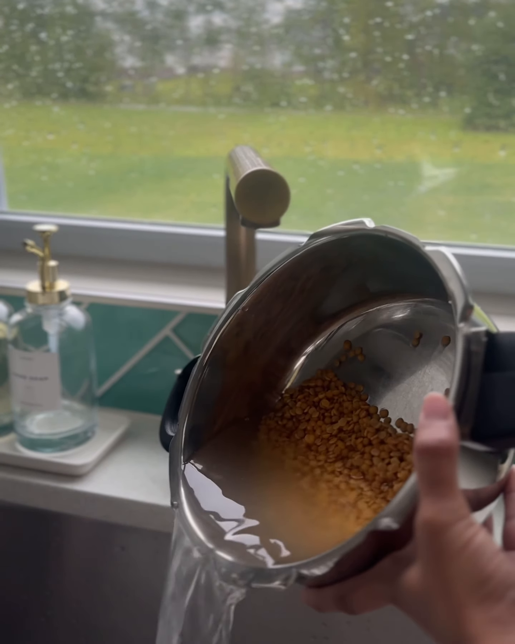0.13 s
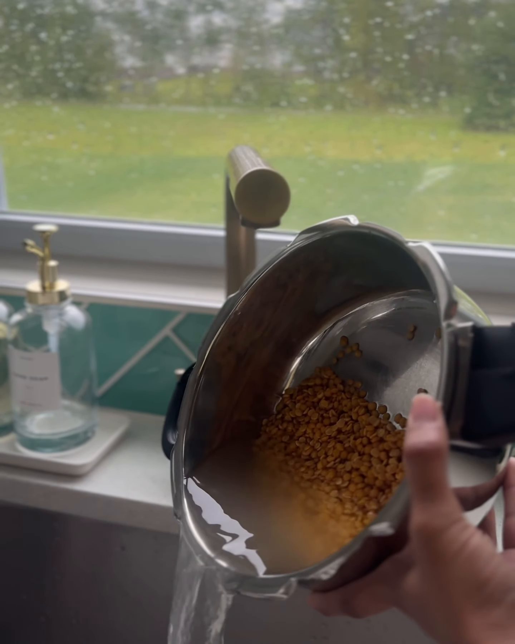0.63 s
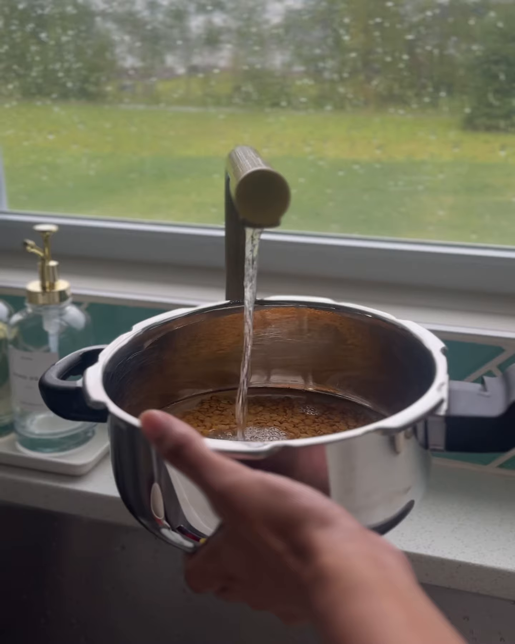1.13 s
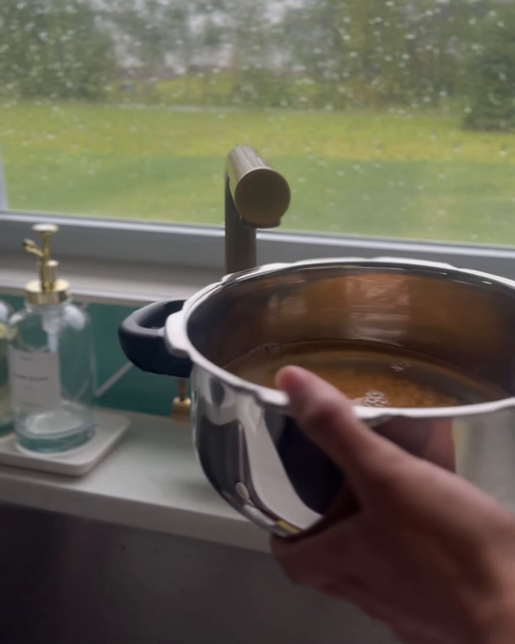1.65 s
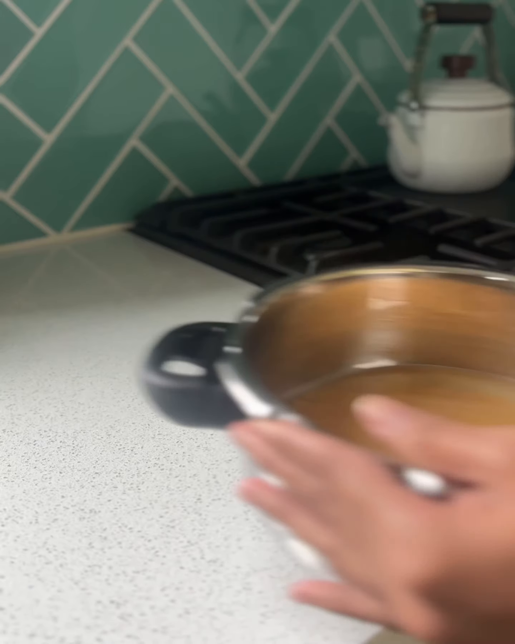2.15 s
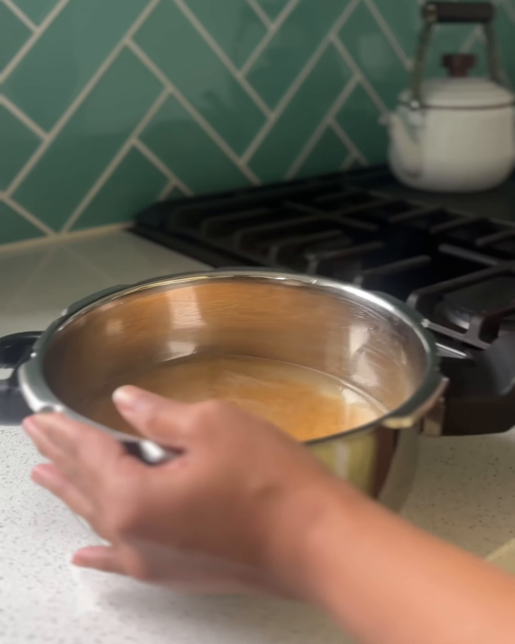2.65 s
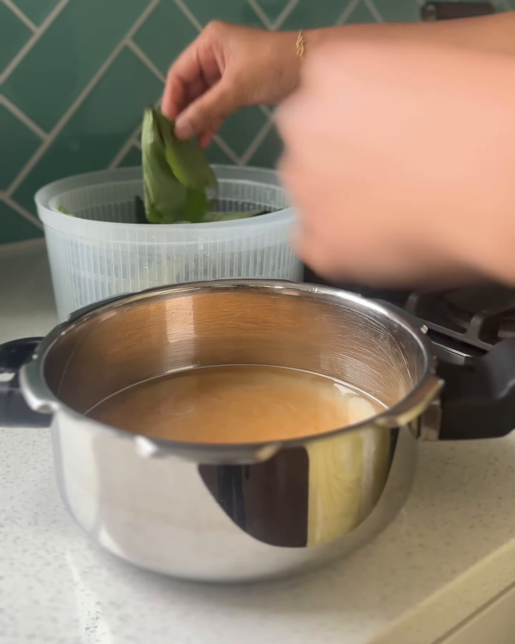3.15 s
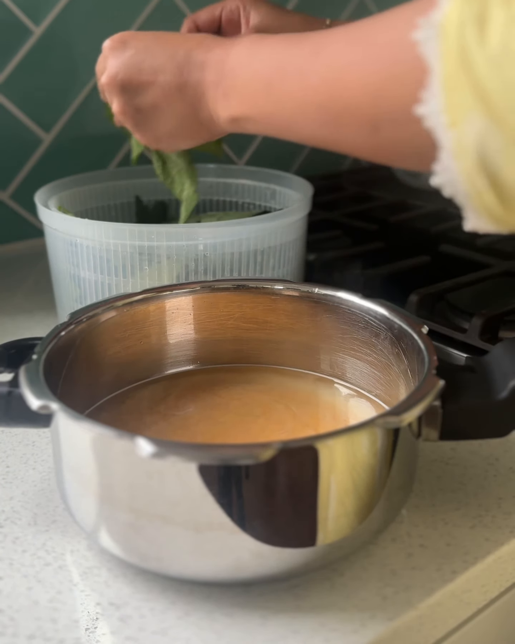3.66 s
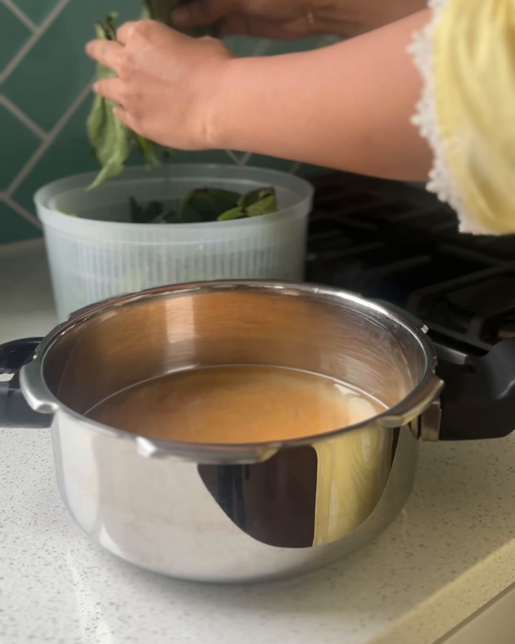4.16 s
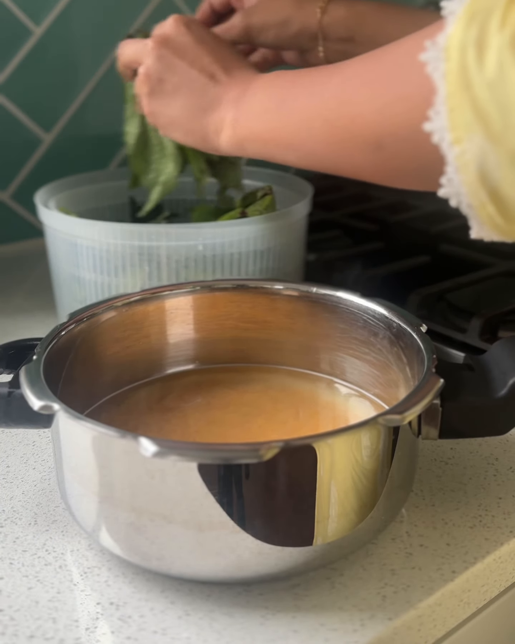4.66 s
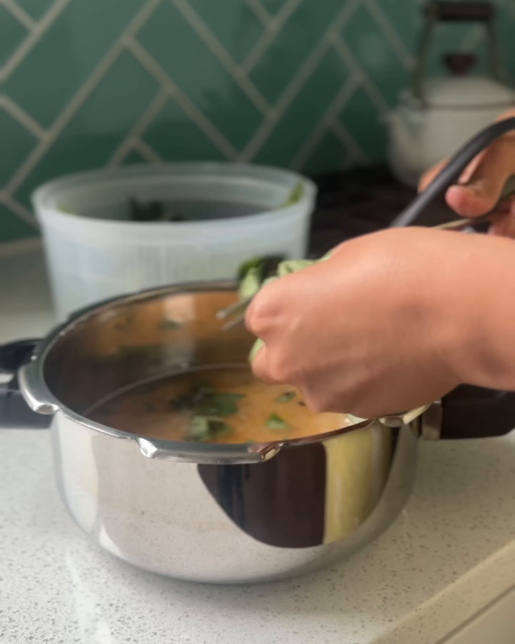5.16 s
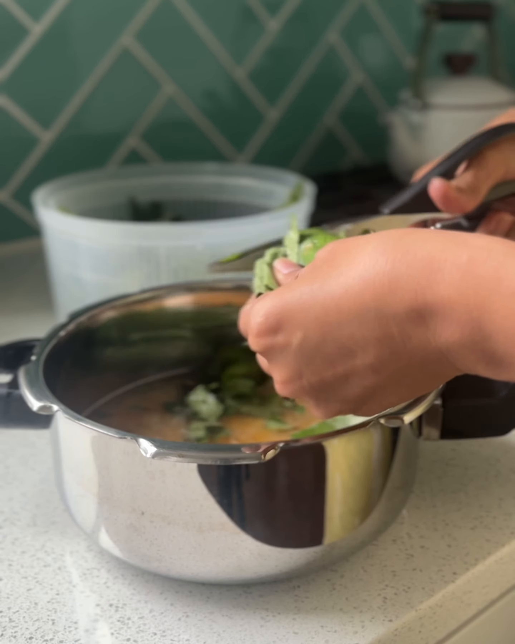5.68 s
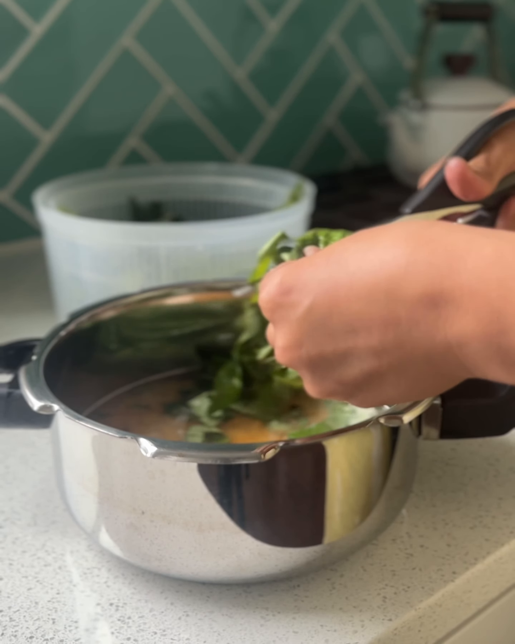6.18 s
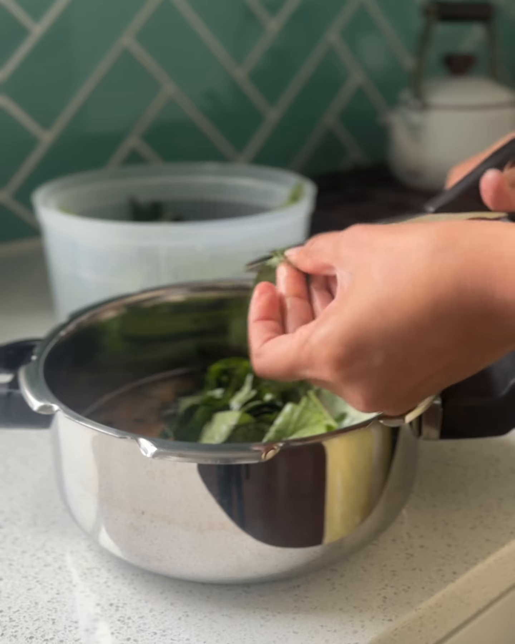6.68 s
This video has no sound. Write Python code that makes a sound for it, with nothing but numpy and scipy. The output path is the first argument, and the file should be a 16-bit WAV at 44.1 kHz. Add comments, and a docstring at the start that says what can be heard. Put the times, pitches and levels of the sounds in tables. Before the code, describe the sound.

Water sloshes hard into a sink, a thin tap stream gurgles in a pot, the pot clanks on stone, then leaves are torn and snipped.

```python
"""Kitchen shots: pot, water and leaves

Short shots on hard cuts, close to a phone: water tipped from a steel pot drums on the sink, a thin tap
stream gurgles in the pot, the pot lands on a stone counter, leaves are torn, then snipped with scissors.
Noise bands make the water and leaves, gliding sines the bubbles, dying sines the pot, slab and blades.
The hard room rings after the pot and leaf sounds; a low hum and a faint hiss lie underneath."""
import sys
import numpy as np
from scipy import signal
from scipy.fft import rfft, irfft
from scipy.io import wavfile
from scipy.ndimage import uniform_filter1d

SR = 44100
rng = np.random.default_rng(int(sys.argv[2]) if len(sys.argv) > 2 else 0)


def ratio(d):
    """dB to gain"""
    e = np.asarray(d, float) / 20
    return 10 ** e


def master_out(mix):
    """Clip the mix to full scale and print it as 16-bit PCM to the path in sys.argv[1]."""
    frames = np.transpose(np.atleast_2d(mix))
    ceiling = np.clip(frames, -1, 1)
    pcm = np.round(ceiling * 32767).astype(np.int16)
    wavfile.write(sys.argv[1], SR, pcm)


N = 300321
T = np.arange(N) / SR

# where one shot ends and the next begins: t/s
CUTS = [0, .079, .697, 1.365, 1.988, 2.973, 3.353, 3.744, 4.1417, 4.543, 4.933, 5.432, 5.933, 6.453, 6.81]
# colour of spray and fizz: f/Hz, relative level per Hz/dB
SPRAY = [(300, -3.5), (500, -15.5), (800, -16.5), (1300, -24), (2000, -12.5), (2600, -8), (3500, -2.5),
         (5000, -2), (6500, 2.5), (8000, 3.5), (10000, 2), (12500, 4), (14500, -1.5), (16000, -3)]
# colour of the leaf noise and of the tails after snips: f/Hz, relative level per Hz/dB
LEAF = [(80, -50), (300, -10), (600, -8), (1300, -6), (2000, -4.5), (2400, -4), (3500, -9), (5500, -3),
        (8000, -8), (10500, 3.5), (13000, -3.5), (16000, -13)]
# one shot rises from a low level: t/s, starting level/dB, time constant/s
FADE_UP = (3.744, -27, 0.13)


def colour(x, table, tilt_db=0., band=None):
    """Shape by (Hz, dB) points and a tilt per octave; with a band, white rms 1 ends as rms 1 inside it."""
    hz = np.fft.rfftfreq(x.shape[-1], 1 / SR) + 1
    table_hz, table_db = np.array(table).T
    level_db = np.interp(np.log(hz), np.log(table_hz), table_db)
    gain = ratio(level_db + tilt_db * np.log2(hz / 2500))
    if band:
        inside = (hz > band[0]) * (hz < band[1])
        gain = gain / np.sqrt(np.mean(gain ** 2 * inside))
    return irfft(rfft(x) * gain, x.shape[-1])


def wide(length, side_db=0.):
    """Independent mid and side noise; the side has its own colour, so the width varies with frequency."""
    # side colour, almost none at 10.5-13.4 kHz: f/Hz, side minus mid level/dB before side_db
    side_width = [(60, -33.5), (200, -12.5), (400, -4), (700, 3), (1000, 1.5), (1600, -8), (2050, -14),
                  (2600, -1.5), (5000, 0), (6000, -16), (8000, -8.5), (9500, -6), (10500, -37),
                  (13400, -40), (14200, -12.5), (16000, -9.5)]
    mid, side = rng.standard_normal((2, length))
    return np.array([mid, ratio(side_db) * colour(side, side_width)])


def bandpass(x, hz, width):
    """Steep band around hz."""
    edges = [max(hz - width / 2, 20), min(hz + width / 2, .45 * SR)]
    return signal.sosfilt(signal.butter(N=2, Wn=edges, btype="band", fs=SR, output="sos"), x)


def flicker(rate, db, length=N):
    """Random gain that moves to a new value about rate times a second."""
    k = max(int(SR / rate), 1)
    steps = np.repeat(rng.standard_normal(length // k + 1), k)
    return ratio(db * 1.6 * uniform_filter1d(steps, k)[:length])


def curves(shots):
    """Columns over time; each shot keeps to its own span, silence elsewhere."""
    out = np.full((len(shots[0][0]) - 1, N), -200.)
    for rows in shots:
        s, *columns = np.transpose(rows)
        shot = np.searchsorted(CUTS, np.mean(s)) - 1
        inside = (T >= CUTS[shot]) & (T < CUTS[shot + 1])
        out[:, inside] = [np.interp(T[inside], s, c) for c in columns]
    return out


def add(out, s, x, peak_db=None):
    """Place a sound at s, scaled to peak_db if given; the next cut chops it."""
    next_cut = CUTS[np.searchsorted(CUTS, s, "right")]
    i, end = int(s * SR), min(int(next_cut * SR), N)
    if peak_db is not None:
        x = x * ratio(peak_db) / np.abs(x).max()
    out[..., i:min(i + x.shape[-1], end)] += x[..., :end - i]


def ring(modes, t):
    """Resonances of a struck body: a sum of dying sines from (Hz, dB, t60 s) rows."""
    return sum(ratio(db) * np.sin(2 * np.pi * hz * t) * np.exp(-np.log(1000) * t / t60)
               for hz, db, t60 in modes)


def swell(length, rise=.25):
    """Quick rise and slower fall on a time scale of length seconds."""
    t = T[:int(4 * length * SR)] / length
    return (1 - np.exp(-t / max(rise, .01))) * np.exp(-2.5 * t)


def bubble(hz, cycles, glide, onset=0.58):
    """A trapped bubble rings a few cycles; a positive glide lifts its pitch as it nears the surface."""
    turns = hz * T[:int(5 * cycles / hz * SR)]
    tone = np.sin(2 * np.pi * turns * (1 + glide * turns))
    tone = tone * np.exp(-turns / cycles) * (1 - np.exp(-turns / onset))
    return tone * [[1], [-.3]]  # mid, side


def pour():
    """The falling sheet drums the thin sink floor; spray hisses, fizzes, slaps and bubbles."""
    # one block per shot: t/s, drumming level/dB, spray level/dB
    sheet = [
        [(0.0, -46.5, -48.5), (0.079, -39, -42.5)],
        [(0.079, -46.5, -48.5), (0.275, -43.5, -50.5), (0.415, -47.5, -50), (0.6, -43, -45),
         (0.697, -40.5, -53)],
    ]
    # sink floor: f/Hz, relative level per Hz/dB
    sink = [(20, -25), (60, -8.5), (85, -10), (103, 7.5), (122, -13), (145, 3), (165, -5), (195, -4),
            (227, -11.5), (290, -16), (325, -12), (370, -18), (520, -12.5), (700, -24), (1000, -30.5),
            (1600, -33.5)]
    # slaps of water: t/s, peak level/dB, centre f/Hz
    splashes = [(0.038, -24.5, 3700), (0.19, -31.5, 6630), (0.264, -19, 8230), (0.3326, -21.5, 5730),
                (0.375, -27, 9030), (0.423, -23.5, 7530), (0.488, -22, 7580), (0.5017, -20, 6630),
                (0.5542, -17.5, 3860), (0.6289, -21, 4060), (0.246, -28.5, 7000), (0.297, -30, 7500),
                (0.345, -30, 5500), (0.45, -28, 6500), (0.592, -26, 4050), (0.601, -27.5, 4050)]
    # single bubbles that stand out of the spray: t/s, peak level/dB, f/Hz
    clear_bubbles = [(0.118, -41.5, 1415), (0.1415, -42, 2380), (0.271, -47, 3290), (0.3627, -40.5, 2470),
                     (0.375, -46, 2230), (0.4514, -57, 3600), (0.523, -42, 2090), (0.531, -31, 3070),
                     (0.539, -37, 3300), (0.5752, -31.5, 3500)]
    drum_db, spray_db = curves(sheet)
    n = int(SR * .7)
    out = np.zeros((2, N))
    drum = colour(wide(n, -18.0), sink, band=(60, 250)) * flicker(30, 1.6, n)
    spray = colour(wide(n, 0.91), [(150, -12.5)] + SPRAY, band=(2000, 6000)) * flicker(60, 1.8, n)
    # patches of spray flare up briefly, each in one band
    for s, pitch, size, span in rng.random((110, 4)):
        shape = swell(0.0035 + 0.017 * span, rise=0.1)
        hz = 1800 * 5.5 ** pitch
        patch = shape * bandpass(wide(len(shape), -2.7), hz, 0.21 * hz)
        add(spray, s * .68, patch, -3.0 + 4 * pitch + 6 * size)
    # fizz of tiny bubbles, few of them loud
    for s, pitch, size in rng.random((900, 3)):
        gain = ratio(-12.5 - 2.7 * np.log(size + .03))
        add(spray, s * .68, gain * bubble(900 * 10 ** pitch, 3.2, 0.004))
    out[:, :n] = ratio(drum_db[:n]) * drum + ratio(spray_db[:n]) * spray
    for s, db, hz in splashes:
        shape = swell(.015, rise=0.082)
        shape = shape * (1 + 0.9 * np.exp(-T[:len(shape)] / 0.003))
        noise = wide(len(shape), -1.4)
        slap = bandpass(noise, hz, 0.28 * hz)
        slap = slap + 0.42 * colour(noise, SPRAY) + 0.12 * bandpass(noise, 1500, 1800)
        add(out, s - .002, shape * slap, db)
    for s, db, hz in clear_bubbles:
        add(out, s - .001, bubble(hz, 6.3, 0.0036), db)
    return out


def tap():
    """The stream shakes the pot wall; air dragged under rings as bubble pairs with small-bubble noise."""
    # gulps of air: t/s, peak level/dB, bubble f/Hz, small-bubble level re gulp/dB, small-bubble f/Hz
    gulps = [(0.712, -50, 1070, -1, 3140), (0.748, -54.5, 1175, 15, 3100), (0.77, -50.5, 1190, 6.5, 2960),
             (0.797, -56, 1156, 10, 3100), (0.808, -48.5, 910, 8.5, 2990), (0.818, -55, 897, 5, 3050),
             (0.873, -51, 877, 5.5, 3035), (0.91, -40, 1066, -0.5, 2380), (0.925, -46.5, 898, -5, 3230),
             (1.026, -47.5, 993, 6, 2320), (1.04, -50, 1066, 3.5, 2320), (1.088, -41, 937, -6.5, 3140),
             (1.172, -56, 1000, 6, 2230), (1.195, -46, 1110, -5, 2400), (1.207, -36, 935, -18, 2380),
             (1.221, -48, 950, -1.5, 3120), (1.256, -42.5, 970, -14, 2090), (1.289, -47, 1068, -9, 3130),
             (1.325, -47, 880, -30, 2960)]
    # wall of the wet pot: f/Hz, width/Hz, relative level/dB
    wet_wall = [(318.5, 25, 1), (913, 130, 3), (1120, 160, -3), (1850, 110, -9), (2100, 340, -20),
                (2380, 220, -5), (2900, 200, -16.5), (3140, 240, -10)]
    stream_db, fizz_db = -58.5, -76
    bubbling_s, gulp_s = .65, .013
    start = CUTS[2]
    out, n = np.zeros((2, N)), int(SR * .67)
    wall = sum(ratio(db) * bandpass(wide(n, -17) * flicker(45, 2.8, n), hz, width)
               for hz, width, db in wet_wall)
    add(out, start, ratio(stream_db) * wall / wall[0].std())
    fizz = colour(wide(n, -10), SPRAY, band=(2000, 6000)) * flicker(82, 2.5, n)
    add(out, start, ratio(fizz_db) * fizz)
    for s, pitch, size in rng.random((450, 3)):
        small = bubble(800 * 4.5 ** pitch, 5.5, 0.0073)
        add(out, start + bubbling_s * s, small, -64 - 2.0 * np.log(size + 0.031))
    weak = [(start + bubbling_s * s, -55 + 6 * (size - .5), 800 + 300 * pitch,
             12 * (small - .5), 2100 + 1000 * high)
            for s, size, pitch, small, high in rng.random((9, 5))]
    shape, wash = swell(gulp_s, rise=0.18), swell(0.017, rise=0.16)
    for s, db, hz, small_db, small_hz in gulps + weak:
        noise = wide(len(shape), -9.0)
        add(out, s - .003, bubble(hz, gulp_s * hz * 0.49, 0.0022, onset=2.2), db)
        # a lower twin beats against the first bubble
        add(out, s + .001, bubble(.9 * hz, gulp_s * hz * 0.8, -0.00096, onset=3.5), db - 8.5)
        add(out, s - .003, shape * bandpass(noise, hz, 190), db - 4.0)
        add(out, s - .003, shape * bandpass(noise, small_hz, 310), db + small_db)
        # the wall answers in all its bands but the lowest
        answer = sum(ratio(g) * bandpass(wide(len(wash), -9), f, w) for f, w, g in wet_wall[1:])
        add(out, s - .002, wash * answer, db - 8.5)
    return out


def knocks():
    """A short push rings slab and pot with a rough lingering clank; bumps ring a dull pair of modes."""
    # pot base meeting the counter: t/s, peak level/dB, push time constant/ms
    landing = (2.6588, -8.5, 0.037)
    # dry pot: f/Hz, relative level/dB, t60/s (capped at 0.3 s below)
    dry_pot = [(190, -7, 0.49), (286.8, -16.5, 0.92), (340, -4.5, 0.73), (493.6, -4.5, 0.31),
               (576, -8.5, 0.11), (687, -6, .8), (770, -9, 0.39), (820, -5.5, 0.3), (864, -4, 0.37),
               (990, -14, .5), (1280, -16.5, .5), (1346, -13.5, .5), (1555, -12.5, .35), (1704, -13, 0.23),
               (2040, -11.5, .1), (3700, -28, .2), (980, -9, 0.082), (1500, -19.5, 5.0),
               (1647, -12.5, 0.12), (1860, -5.5, 0.17), (2230, -25, 0.54), (2470, -28, 0.89),
               (2568, -5, 0.17), (3450, -34, 0.56), (5270, -41, 0.62), (6725, -40, 0.62)]
    # counter slab: f/Hz, relative level/dB, t60/s
    slab = [(150, -22, 0.12), (340, -4, 0.11), (290, -12.5, 0.091), (1613, 16, 0.0085), (830, 2, 0.025),
            (524, -14, 0.02), (665, -5, 0.048), (2600, -5.5, 0.036), (3700, -12, 0.011), (5500, -8, 0.013)]
    # rough clank: f/Hz, relative level per Hz/dB
    clank_colour = [(120, -9), (350, -3.5), (700, 5.5), (1600, -3), (2300, -7), (2650, -3.5), (3000, -17.5),
                    (3500, -10.5), (4000, -15.5), (4400, -23.5), (7000, -15.5), (10000, -21),
                    (16000, -29.5)]
    # soft bumps as the pot rocks and the colander is nudged: t/s, peak level/dB, f/Hz, t60/s
    bumps = [(2.868, -30, 750, 0.041), (2.8765, -30.5, 674, 0.02), (2.889, -49, 810, .025),
             (2.909, -32, 673, 0.023), (2.926, -40.5, 607, 0.05), (3.914, -56, 202, 0.025),
             (4.005, -64, 775, 0.025), (4.011, -49, 150, 0.016), (4.036, -63, 201, 0.018),
             (4.089, -56, 150, 0.027), (4.119, -54, 160, 0.024), (4.088, -61.5, 820, 0.029),
             (4.118, -60, 665, 0.048), (4.130, -51, 830, 0.03), (4.1355, -42.5, 777, 0.02),
             (4.138, -46, 170, 0.056)]
    out, t = np.zeros(N), T[:int(.35 * SR)]
    s, db, ms = landing
    pot = sum(ring([(f, g, min(d, .3))], t) * flicker(60, 1.2, len(t)) for f, g, d in dry_pot)
    decay = 0.6 * np.exp(-t / 0.0078) + 0.14 * np.exp(-t / 0.028) + 0.081 * np.exp(-t / 0.1382)
    clank = colour(rng.standard_normal(len(t)), clank_colour) * decay
    push = (t[:300] / ms) ** 2 * np.exp(-t[:300] / ms * 1000)
    body = ring(slab, t) + ratio(-19.5) * pot + ratio(9.0) * clank
    # the base lands edge first, so the blow builds over a millisecond
    body = body * (1 - np.exp(-t / 0.001))
    add(out, s, bandpass(np.convolve(body, push), 7940.0, 15683), db)
    for s, db, hz, t60 in bumps:
        scuff = colour(rng.standard_normal(len(t)), clank_colour) * np.exp(-t / 0.0022)
        pair = ring([(hz, 0, t60), (1.123 * hz, -6, t60)], t) * flicker(150, 0.97, len(t))
        add(out, s, (pair + 0.19 * scuff) * (1 - np.exp(-t / 0.0025)), db)
    return out


def leaves():
    """Snaps are a few ms of noise with a blade ring; crunches are swarms of tiny cracks."""
    # stems giving way, blades and rims touching; at 4.139 s the click of a cut:
    # t/s, peak level/dB, centre f/Hz, treble level re peak/dB
    snaps = [(2.906, -47.5, 2900, -13), (3.653, -56, 2780, 4), (3.702, -49, 2757, -21),
             (4.139, -57, 2500, -8), (4.2845, -59.5, 2000, -20), (4.7273, -43.5, 2500, -8),
             (4.731, -43, 2400, -8), (4.737, -45, 2340, -10), (4.8815, -49, 1830, -16),
             (4.94, -50, 2380, -6), (5.014, -52, 2400, 14.5), (5.0305, -43, 1380, -10),
             (5.0464, -34, 2380, -14), (5.086, -44, 2320, 5), (5.0253, -43, 2400, -1),
             (5.1276, -35.5, 2240, -9), (5.1286, -27.5, 2100, 1), (5.137, -39, 2300, -5.5),
             (5.1388, -38, 2300, -11), (5.1419, -23.5, 4850, 7), (5.1415, -37, 750, -6),
             (5.1494, -29.5, 2160, 9.5), (5.16, -45, 6000, 23), (5.167, -46, 6040, 21.5),
             (5.2752, -48, 2500, -12), (5.309, -47.5, 2470, -12.5), (5.5027, -38, 2100, 5),
             (5.5331, -27, 2000, 4.5), (5.5401, -38, 2140, 6), (5.544, -30, 2260, 0),
             (5.662, -57, 2500, 19), (5.5661, -29, 2400, -19), (5.6742, -38.5, 5700, 0),
             (5.9762, -57, 2620, 19), (5.9975, -45, 2400, 12), (6.007, -45, 2380, 16),
             (6.011, -39, 2300, -6.5), (6.027, -36, 2390, 8), (6.041, -35, 2500, -2),
             (6.044, -40, 790, -20), (6.047, -37, 2300, -5), (6.071, -43, 2200, -8),
             (6.096, -43, 2300, -12), (6.56, -65, 4200, 29.5), (6.5695, -60, 5560, 18),
             (6.586, -59, 4430, 18), (6.598, -54, 6000, 13), (6.6028, -36.5, 6160, 11),
             (6.613, -57, 6000, 17), (6.6363, -25, 2100, -3), (6.645, -48, 2320, -21.5)]
    # leaves tearing or crushed between the blades: t/s, length/s, level/dB, tilt/dB per octave
    crunches = [(2.976, 0.049, -66, -3.5), (3.643, 0.04, -66, -2), (3.68, 0.064, -69, -1.5),
                (3.975, 0.037, -80, 2), (4.673, 0.076, -66.5, -4), (4.716, 0.03, -57.5, -2),
                (4.863, 0.0094, -65, -3), (5.493, 0.027, -59, 0), (4.935, 0.018, -59, 1),
                (5.021, 0.018, -51, 2.5), (5.041, 0.017, -53, 3.5), (5.06, 0.04, -61, 0),
                (5.121, 0.041, -39.5, 0.5), (5.265, 0.035, -70.5, 12), (5.384, 0.021, -76, -7),
                (5.523, 0.026, -41.5, 1.5), (5.986, 0.056, -53, 1.5), (6.025, 0.032, -47.5, 0.5),
                (6.179, 0.012, -55, 2), (6.598, 0.035, -54, 4), (6.627, 0.02, -48.5, -0.5)]
    # faint ticks of handled leaves: from t/s, to t/s, middle peak level/dB, spread either way/dB
    faint_ticks = (4.55, 6.63, -65, 3)
    blade = [(2400, -24, 0.06)]  # f/Hz, level re snap/dB, t60/s
    cracks_per_s, crack_s, even_bed = 500, .001, .3
    out, t = np.zeros(N), T[:int(.05 * SR)]
    start, end, tick_db, spread_db = faint_ticks
    ticks = [(start + (end - start) * s, tick_db + spread_db * 2 * (size - .5),
              1700 * 2.5 ** pitch, 20 * (treble - .5))
             for s, size, pitch, treble in rng.random((12, 4))]
    snap_shape = (1 - np.exp(-t / .0005)) * (np.exp(-t / .0015) + .15 * np.exp(-t / .006))
    for s, db, hz, treble_db in snaps + ticks:
        noise = rng.standard_normal(len(t)) * snap_shape
        low = bandpass(noise, hz, 0.65 * hz)
        add(out, s - .001, low / np.abs(low).max() + ring(blade, t), db)
        add(out, s - .001, bandpass(noise * np.exp(-t / 0.003), 10950, 7800), db + treble_db)
    for s, length, db, tilt in crunches:
        part = T[:int(1.6 * length * SR)] / length
        n = len(part)
        shape = np.clip(part / 0.25, 0, 1) * np.clip(1.6 - part, 0, 1.1) ** 0.86
        starts = (rng.random(n) < cracks_per_s / SR) * rng.random(n)
        bursts = even_bed + signal.lfilter([1], [1, -np.exp(-1 / (crack_s * SR))], starts)
        grains = rng.standard_normal(n) * bursts * flicker(900, 2.26, n)
        cracks = colour(grains, LEAF, tilt, band=(1000, 6000))
        squeak = ratio(-5) * bandpass(cracks, 2400, 280)
        add(out, s, ratio(db) * shape * (cracks + squeak))
    return out


def rubs():
    """Wet leaves rub in a narrow band that swells softly; faint patches of rustle come at random."""
    # clear squeaks: t/s, length/s, peak level/dB, f/Hz
    squeaks = [(3.482, 0.065, -62, 2600), (3.673, 0.072, -53.5, 2720), (4.2, .02, -75.5, 2900),
               (4.28, 0.03, -68, 2900), (4.659, 0.01, -56.5, 5640), (5.392, 0.024, -50, 2100)]
    # faint patches while leaves are handled: from t/s, to t/s, middle peak level/dB, spread either way/dB
    patches = (2.98, 4.93, -74, 4)
    out = np.zeros(N)
    start, end, patch_db, spread_db = patches
    faint = []
    for s, span, size, pitch in rng.random((45, 4)):
        at = start + (end - start) * s
        # none in the first 0.2 s of the shot that fades up
        if abs(at - FADE_UP[0] - .1) > .1:
            level_db = patch_db + spread_db * 2 * (size - .5)
            faint.append((at, 0.014 + 0.04 * span, level_db, 1800 * 4.5 ** pitch))
    for s, length, db, hz in squeaks + faint:
        shape = swell(length, rise=0.38)
        noise = rng.standard_normal(len(shape)) * flicker(296, 1.4, len(shape))
        add(out, s, shape * bandpass(noise, hz, 0.24 * hz), db)
    return out


def snip_tails():
    """After each main snip a hissy room tail fades evenly, then drops faster."""
    # t/s, starting level/dB, time until the faster drop/s
    tails = [(4.721, -91, .3), (5.16, -62.5, .3), (5.55, -63, 0.29), (6.03, -64, 0.38), (6.631, -69.5, .3)]
    fade_db_per_s, stop_db_per_s, tilt_db_per_octave = -43, -200, -2.5
    out, t = np.zeros((2, N)), T[:SR // 2]
    for s, db, length in tails:
        noise = colour(wide(len(t)), LEAF, tilt_db_per_octave, band=(1000, 6000))
        noise = noise * flicker(30, 1.5, len(t))
        level = ratio(db + fade_db_per_s * t + stop_db_per_s * np.clip(t - length, 0, None))
        add(out, s, level * (1 - np.exp(-t / 0.0055)) * noise)
    return out


def in_room(near):
    """Direct sound in the mid, scatter in the side, and a tail with its own decay per band; cuts stop it."""
    # tail: f/Hz, t60/s, relative level/dB
    tail_bands = [(150, 1, -6), (304, 1, -11), (615.3, 0.73, -16.5), (1190, 0.2194, -12), (2400, 0.66, -18),
                  (4434, 0.49, -13.5), (9190, 0.39, -26.5)]
    # colour of the scattered side sound, with a gap at 10.5-13.4 kHz: f/Hz, relative level per Hz/dB
    scatter_colour = [(250, -25), (600, -8.5), (1200, -11.5), (3000, -7.5), (7000, -1.5), (9500, -12),
                      (10500, -33.5), (13400, -40.5), (14500, -20)]
    t = T[:int(.6 * SR)]
    noise = wide(len(t)) * (1 - np.exp(-t / 0.0017))
    tail = sum(ratio(db) * bandpass(noise, hz, 0.84 * hz) * np.exp(-np.log(1000) * t / t60)
               * np.sqrt(14 / t60 / SR) for hz, t60, db in tail_bands)
    scatter = ratio(-32.0) * colour(rng.standard_normal(len(t)), scatter_colour) * np.exp(-t / 0.057)
    response = ratio(8) * tail + np.array([t == 0, scatter])
    out = np.zeros((2, N))
    for a, b in zip(CUTS, CUTS[1:]):
        add(out, a, signal.fftconvolve(near[None, int(a * SR):int(b * SR)], response))
    return out


def room_tone():
    """Low hum with a narrow drone, and a hiss whose dull and bright parts flicker separately."""
    # hum: f/Hz, relative level per Hz/dB
    hum_colour = [(25, -25.5), (40, -5), (60, 2.5), (100, 0), (150, -10), (220, -13), (320, -19),
                  (450, -30.5), (700, -29)]
    # hiss: f/Hz, relative level per Hz/dB
    air = [(300, 0), (500, -7), (800, -12.5), (1300, -11.5), (2000, -13.5), (2600, -16.5), (3500, -19),
           (5000, -19.5), (6500, -18.5), (8000, -20.5), (10000, -19), (12500, -23), (14500, -29),
           (16000, -38)]
    # each shot from the tap on: hum level/dB, hiss level at the cut/dB, hiss level it drifts to/dB,
    # hiss tilt/dB (bright part up, dull part down)
    tone_levels = [(-61, -65.5, -66, 4.5), (-60, -84.5, -69.5, 0), (-62, -81.5, -82, 0.5),
                   (-62, -79, -73, 3.5), (-64, -75, -83.5, 1), (-60, -87.5, -75, 1), (-62, -80.5, -76, 2),
                   (-60, -81.5, -71, 2), (-61.5, -71, -74.5, 3.5), (-61, -74, -82.5, 1.5),
                   (-62, -73.5, -78, 3), (-63.5, -85, -72.5, 1)]
    drift_s = 0.23
    shot = np.searchsorted(CUTS, T, "right") - 1
    rows = [(-200, -200, -200, 0)] * 2 + tone_levels  # the two pouring shots have no tone
    hum_db, first_db, last_db, tilt = np.transpose(rows)[:, shot]
    age = T - np.array(CUTS)[shot]
    hiss_db = last_db + (first_db - last_db) * np.exp(-age / drift_s)
    s, db, rise = FADE_UP
    fade = ratio(db * (T >= s) * np.exp(-np.abs(T - s) / rise))
    hum = colour(wide(N), hum_colour + [(1500, -57)], band=(40, 200))
    drone = bandpass(wide(N), 315, 26)
    hum = hum + ratio(-17.5) * drone / drone[0].std()
    noise = colour(wide(N), [(120, -24.0)] + air, band=(1000, 6000))
    dull = colour(noise, [(1200, -0.5), (5000, -27.5)])
    bright = noise - dull
    hiss = ratio(-tilt) * flicker(9, 1.5) * dull + ratio(tilt) * flicker(13, 1.4) * bright
    hiss = ratio(hiss_db) * flicker(25, 0.672) * hiss
    return fade * (ratio(hum_db) * flicker(3.1, .8) * hum + hiss)


def scene():
    """All sources as left and right; every shot closes, and all but the first open, with a short fade."""
    fade_in_s, fade_out_s = 0.0081, 0.0017  # time constant, length
    water = pour() + tap()
    handled = in_room(knocks() + leaves() + rubs())
    mid, side = water + handled + snip_tails() + room_tone()
    shot = np.searchsorted(CUTS, T, "right")
    age, left = T - np.array(CUTS)[shot - 1], np.array(CUTS)[shot] - T
    opening = 1 - (shot > 1) * np.exp(-age / fade_in_s)
    closing = np.clip(left / fade_out_s, 0, 1)
    return np.array([mid + side, mid - side]) * opening * closing


def low_pass(x):
    """Removes everything above the highest recorded frequency."""
    return signal.sosfilt(signal.butter(12, 16970, fs=SR, output="sos"), x)


def record(dry):
    """Two ports on one phone: the right leads in the treble by a phase set per frequency; the top is cut."""
    # right-port lead by frequency, opposite phase at 10.3-13.4 kHz: f/Hz, phase lead/rad
    port_lead = [(5400, 0), (6000, 0.47), (7000, 1.62), (8000, 1.4), (9000, 2), (9700, 4.5), (10300, np.pi),
                 (13400, np.pi), (14500, 4.5), (16000, 6.5)]
    top_hz = 15900
    hz = np.fft.rfftfreq(N, 1 / SR)
    lead = np.interp(hz, *np.transpose(port_lead))
    ports = np.exp(.5j * lead * np.array([[-1], [1]]))
    top_cut = np.clip((top_hz - hz) / 500 + .5, 0, 1) ** 2
    mix = irfft(rfft(dry) * ports * top_cut, N)
    return low_pass(mix)


dry = scene()
out = record(dry)
master_out(out)
```